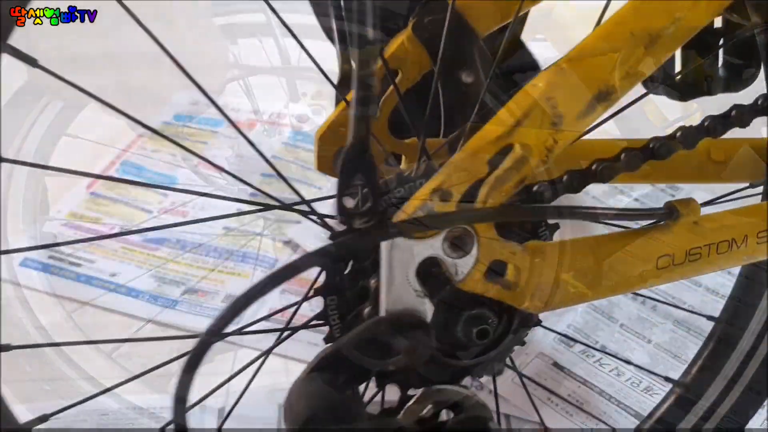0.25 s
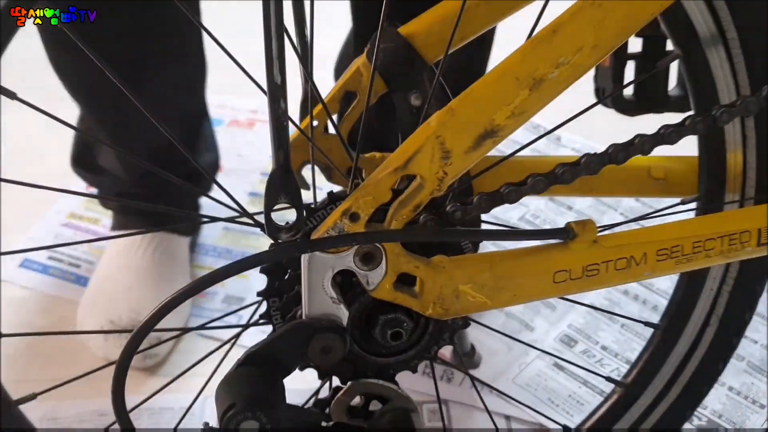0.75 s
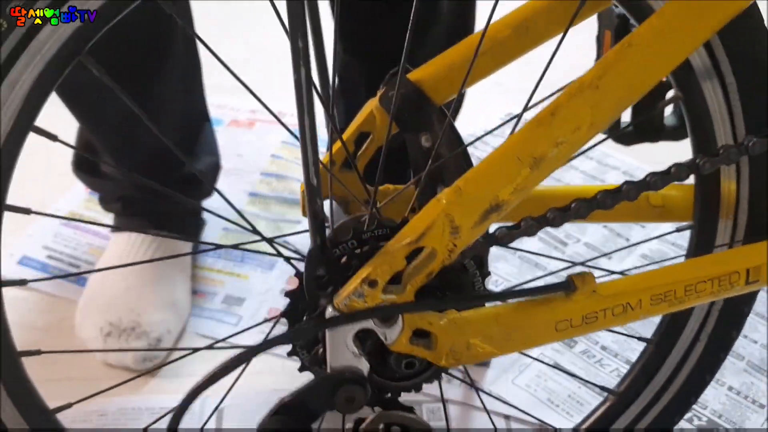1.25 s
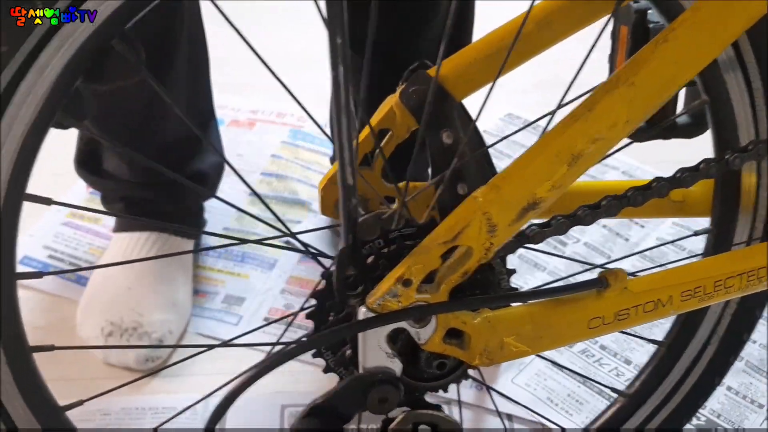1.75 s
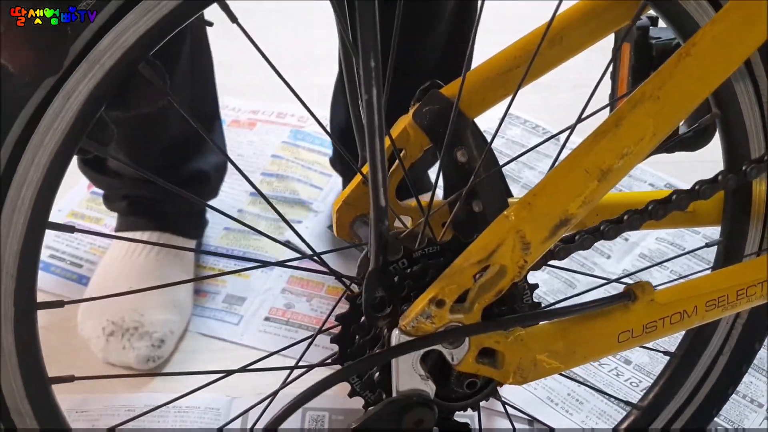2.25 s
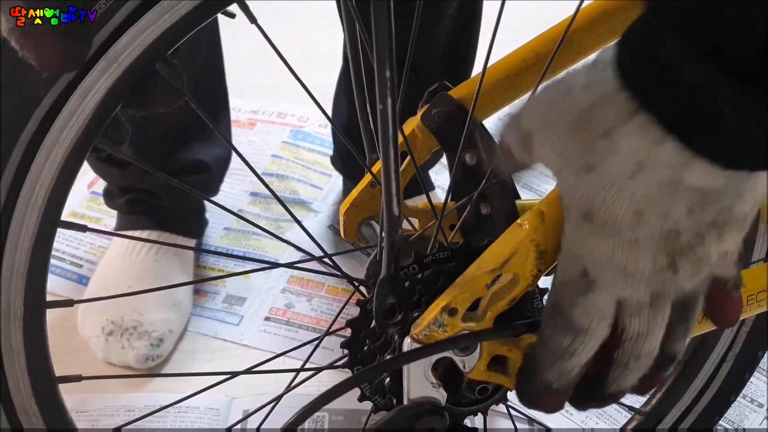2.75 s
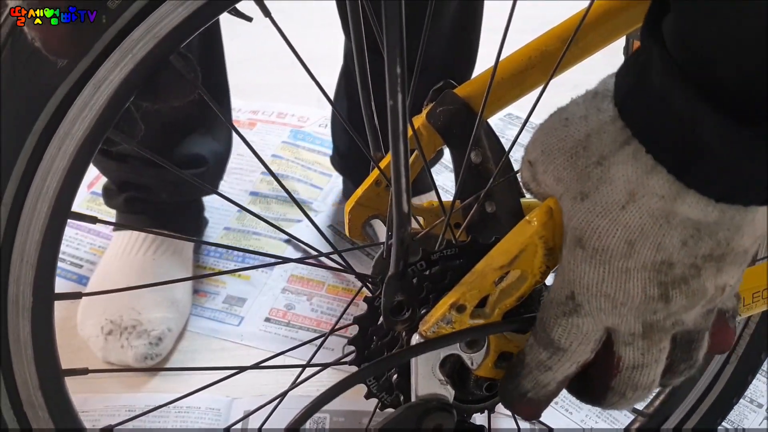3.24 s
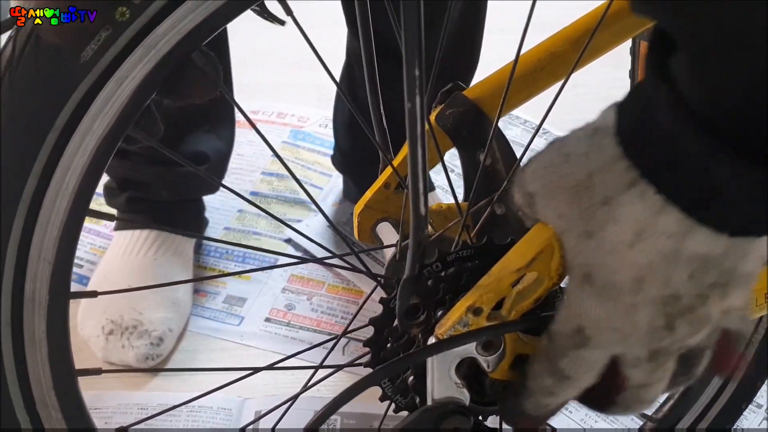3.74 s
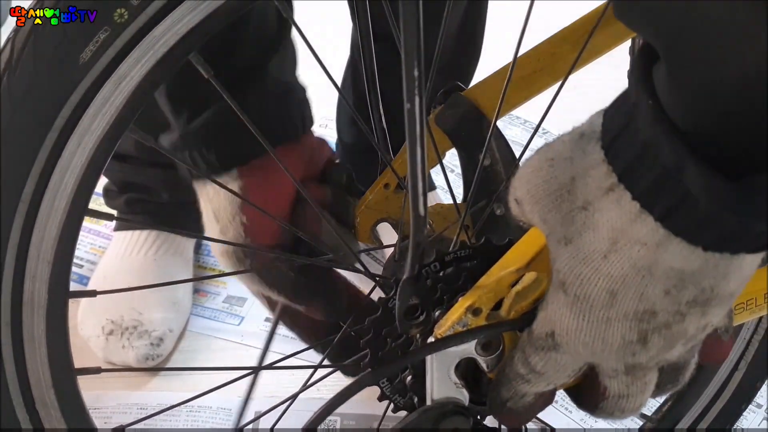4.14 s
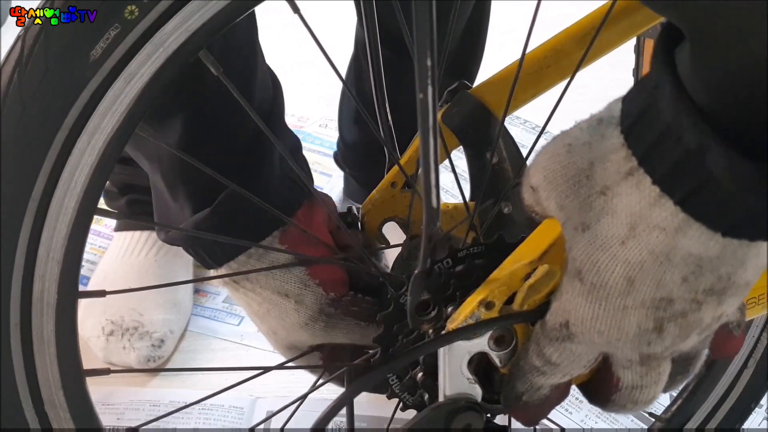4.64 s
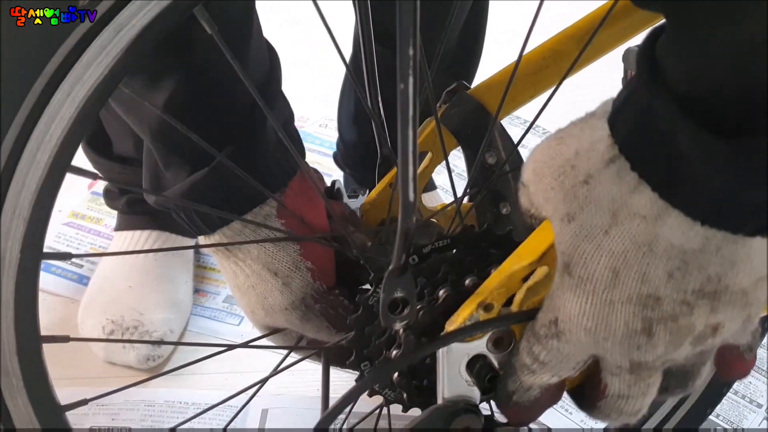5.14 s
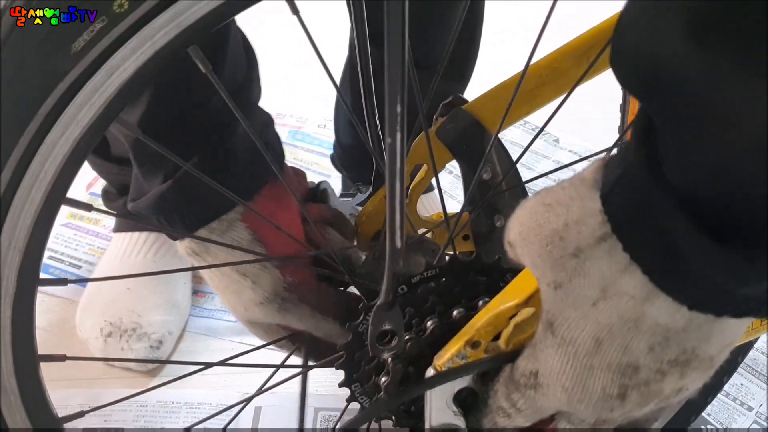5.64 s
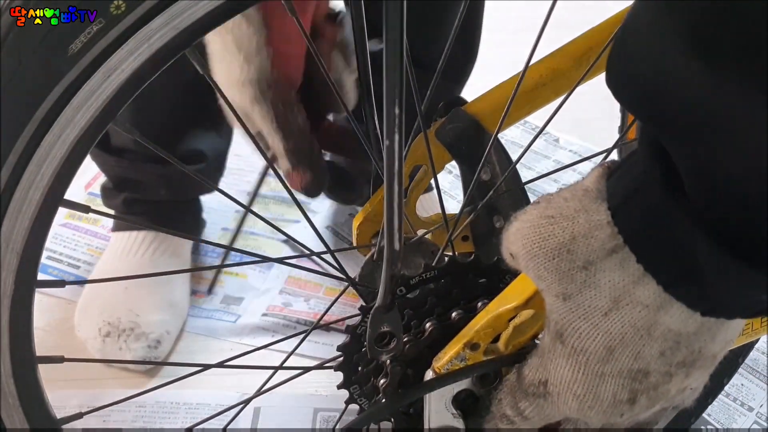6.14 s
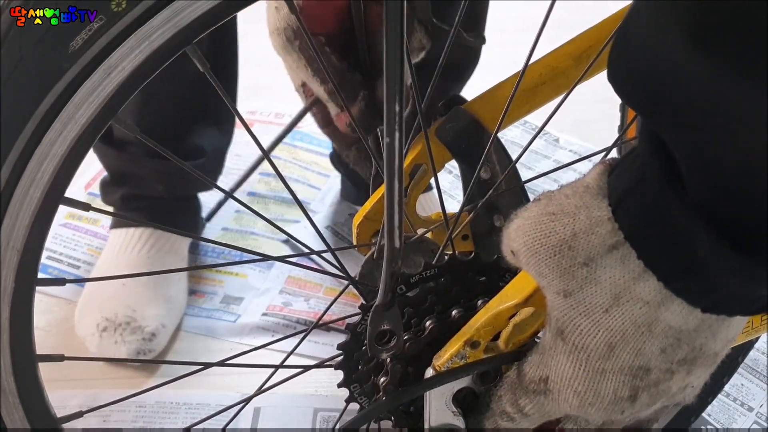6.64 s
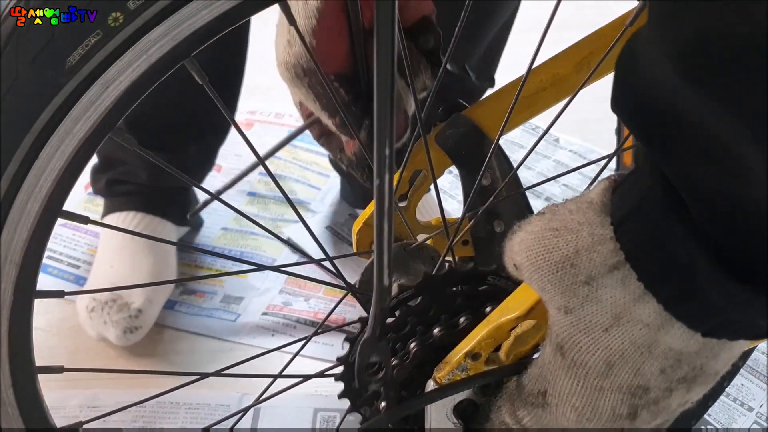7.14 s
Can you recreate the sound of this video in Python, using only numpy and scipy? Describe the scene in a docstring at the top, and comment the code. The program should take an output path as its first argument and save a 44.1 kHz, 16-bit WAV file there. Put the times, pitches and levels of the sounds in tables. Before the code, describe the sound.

A bicycle wheel is worked into its frame with metal knocks, scrapes, chain ticks and a tool tapping spokes in a small room.

```python
"""Refitting a bicycle's rear wheel

A small hard-walled room, a stereo pair of microphones close to a bicycle standing on newspaper.
As the wheel is worked into the frame, the axle scrapes and knocks in the dropouts and sets the tubes
ringing, the chain ticks over the sprockets and the tyre bumps on the floor. A gloved hand reaches
through the wheel with a thin tool that taps the spokes and clanks on the hub."""
import sys
import numpy as np
from scipy import signal
from scipy.fft import rfft, irfft
from scipy.io import wavfile

SR = 44100
rng = np.random.default_rng(int(sys.argv[2]) if len(sys.argv) > 2 else 0)


def digitize_waveform(pressure):
    """Quantize a signal to 16-bit integers and store it at the path in sys.argv[1].

    Rows of a 2-D input are taken as channels; values are limited to [-1, 1].
    """
    field = np.atleast_2d(pressure).T
    bounded = np.clip(field, -1, 1)
    quanta = np.round(bounded * 32767).astype(np.int16)
    wavfile.write(sys.argv[1], SR, quanta)


N = 325899

# gloves, chain and tyre slide steadily: t/s, length/s, level/dB, rumble/dB re level
SLIDES = [(0, 0.12, -56.5, -9.5), (0.31, 0.42, -71, 2), (0.66, 0.49, -69.5, -29), (0.968, 0.047, -60.5, -7),
          (1.218, 0.35, -65.5, 2.5), (1.77, 0.09, -62, -3.5), (2.135, 0.16, -62, -6.5),
          (2.315, 0.65, -71.5, 0), (3.171, 0.21, -68.5, -1), (3.716, 0.18, -67, 1),
          (3.877, 0.54, -73.5, -0.5), (4.372, 0.57, -63.5, 3.5), (5.128, 0.15, -68.5, 7),
          (5.933, 0.23, -77.5, -0.5), (6.64, 0.87, -74.5, 2.5), (7.153, 0.13, -64.5, -5.5)]
# the wheel is shoved and the axle grinds in the dropouts: peak t/s, level/dB
SHOVES = [(1.958, -50.5), (3.554, -54.5), (4.855, -56.5), (5.333, -50), (5.375, -47)]
# spectra of the rubbing, its scrape and its low rumble: f/Hz, level/dB
SCRAPE_SPECTRUM = [(700, -4.5), (1100, -6), (1600, -1), (2200, -5), (3400, -4.5), (5500, -7), (7800, -12.5),
                   (10000, -10), (15000, -16.5)]
RUMBLE_SPECTRUM = [(100, 6.5), (230, -1), (360, 1.5), (800, -7)]
# metal sticks and slips: t/s, length/s, f/Hz, level/dB, upper octave/dB re level
SQUEAKS = [(0.04, .07, 1985, -52, 5), (5.263, .006, 3000, -48, -16)]
# axle and hub knock on the frame: t/s, level/dB, bass/dB re level, treble/dB re level, t60/s
KNOCKS = [(0.142, -16.5, 4, -1.5, 0.087), (0.1478, -35.5, 13.5, -4, 0.16),
          (1.0694, -43.5, 18.5, 10.5, 0.026), (1.3071, -47.5, 13.5, 2.5, 0.09),
          (1.532, -45.5, 11.5, 6.5, 0.027), (1.958, -44, 9.5, 10, 0.083), (2.0291, -44, 5.5, 6, 0.038),
          (2.822, -50.5, 2, 0, 0.16), (3.5032, -35.5, 7.5, -3.5, 0.072), (3.536, -42, 5.5, 2.5, 0.064),
          (3.597, -45.5, 11, 5, 0.066), (4.639, -45, -13, 7.5, 0.078), (4.716, -52, 10, 14, 0.19),
          (4.8735, -35.5, 7, 0, 0.044), (5.3256, -27.5, -18, 4, 0.017), (5.3535, -31.5, -10, 9.5, 0.021)]
# modes of frame and wheel: f/Hz, level/dB, t60/s
FRAME_MODES = [(545, 2, .11), (702, -6, .12), (864, -6, .25), (1901, -8, .3), (2735, -1, .2),
               (2904, 0, .25), (3016, -1, .25), (3283, 12, .08), (3432, -1, .22), (3712, -1, .25)]
# spectrum of metal contact, for knocks and chain: f/Hz, level/dB
CONTACT_SPECTRUM = [(150, -4.5), (400, -4), (550, -8.5), (1200, -4), (1600, -4), (2200, -1), (3400, 0.5),
                    (4800, -5.5), (7500, -11), (10000, -11), (15000, -19)]
# links tick on the sprockets: t/s, level/dB, treble/dB re level
CHAIN_TICKS = [(0.858, -44.5, -5.5), (1.727, -50, 3.5), (1.771, -48, 6), (2.007, -45, -13),
               (2.305, -42.5, 2), (2.952, -47.5, -4.5), (3.25, -53, 10), (3.426, -49.5, -4),
               (3.669, -49, 4.5), (3.743, -39.5, 3), (5.1699, -39, -14), (5.306, -36, -6.5),
               (6.874, -47.5, 1), (7.077, -63.5, 19)]
# the tyre meets the floor: t/s, bounce level/dB, bounce f/Hz, thud level/dB
TYRE_BUMPS = [(1.003, -54, 60, -36.5), (1.017, -35.5, 57, -56), (1.305, -57.5, 77, -46.5),
              (1.616, -59, 60, -52.5), (1.916, -45, 60, -47.5), (1.94, -50.5, 81, -40.5),
              (2.824, -63.5, 64.5, -50), (3.509, -46.5, 83.3, -57), (4.454, -67.5, 60, -42.5),
              (4.497, -66, 60, -49), (5.357, -47, 60, -39.5), (5.374, -41.5, 48.6, -45),
              (5.41, -41.5, 55.4, -43), (5.425, -62, 60, -43.5)]
# modes of the tyre casing: f/Hz, level/dB, t60/s
TYRE_MODES = [(144.4, -3.5, 0.21), (242, 0.11, 0.064), (292, -4, 0.076), (364, -4.5, 0.085)]
# the frame settles with a dull clunk: t/s, level/dB
CLUNKS = [(1.517, -41.5), (4.76, -50.5), (4.859, -41), (4.875, -35), (7.185, -58.5)]
# modes of its hollow tubes: f/Hz, level/dB, t60/s
TUBE_MODES = [(215, -3, .12), (544, 0, .13), (692, -2, .12)]
# the tool taps the spokes: t/s, tick level/dB, twang level/dB, left/dB re right
SPOKE_TAPS = [(4.3354, -35, -36, 3), (4.4315, -37.5, -40, 1), (4.530, -37.5, -62, -0.5),
              (4.546, -41, -65, -4)]
# modes of a tensioned spoke: f/Hz, level/dB, t60/s
SPOKE_MODES = [(603, -7, .13), (1118, -2, .055), (6800, -7, .13)]
# spectrum of the tick on a spoke: f/Hz, level/dB
TAP_SPECTRUM = [(700, -16.5), (1400, -0.5), (2000, -14), (4300, -8), (6800, -1), (7800, -10), (9300, -2.5),
                (15000, -9)]
# the tool's shaft strikes the hub: t/s, crack level/dB, ring level/dB, crack t60/s
CLANKS = [(4.565, -25, -59, 0.064), (4.732, -56, -47.5, 0.054), (5.4368, -32.5, -52, 0.015),
          (7.182, -43.5, -64, 0.099)]
# modes of the shaft, also pitched up for the chain links: f/Hz, level/dB, t60/s
SHAFT_MODES = [(1120, -5, .03), (1960, 6, .07), (2347, -9, .2)]
# spectrum of a clank: f/Hz, level/dB
CLANK_SPECTRUM = [(600, -5.5), (1150, 5.5), (1500, 0), (2200, 6), (3400, -1.5), (4500, -1), (7500, -15),
                  (15000, -32)]
# the slack chain shakes: start t/s, end t/s, level/dB
CHAIN_SHAKE = (4.6, 4.9, -51.5)
# the tool's tip skips along a spoke: t/s, level/dB
TIP_SKIPS = [(7.158, -37), (7.263, -37.5)]
# reverberation time of the room: f/Hz, t60/s
ROOM_DECAY = [(500, .43), (900, .6), (3500, .49), (15000, .35)]
# spectrum of the room tone: f/Hz, level/dB
ROOM_TONE_SPECTRUM = [(20, -22.5), (50, -2), (80, 3), (130, -21.5), (300, -26.5), (3000, -54),
                      (15000, -55.5)]


def from_db(db):
    return 10 ** (np.asarray(db) / 20)


def unit_rms(x):
    return x / np.sqrt(np.mean(x ** 2) + 1e-20)


def at_hz(points, hz):
    """Read a table on a log-frequency axis."""
    known_hz, values = np.transpose(points)
    return np.interp(np.log(np.maximum(hz, 1)), np.log(known_hz), values)


def seconds(length):
    return np.arange(int(length * SR)) / SR


def add(track, s, sound):
    """Mix a sound in at time s."""
    at = max(round(s * SR), 0)
    track[..., at:at + sound.shape[-1]] += sound[..., :N - at]


def pan(left_db):
    """Gains that put the left microphone left_db above the right."""
    return from_db(np.array([[left_db], [-left_db]]) / 2)


def band(x, hz, kind="band", order=2):
    return signal.sosfilt(signal.butter(order, hz, kind, fs=SR, output="sos"), x + 1e-18)


def colour(x, spectrum, size=4096):
    """Causal filter of the given shape, falling away past its ends; white noise keeps its power."""
    hz = np.maximum(np.arange(size // 2 + 1) * SR / size, 1)
    skirts = np.minimum(hz / spectrum[0][0], 1) ** 2 * np.minimum(spectrum[-1][0] / hz, 1) ** 2
    gain = unit_rms(from_db(at_hz(spectrum, hz)) * skirts)
    cepstrum = irfft(np.log(gain))
    cepstrum[1:size // 2] *= 2   # fold to minimum phase
    cepstrum[size // 2 + 1:] = 0
    impulse = irfft(np.exp(rfft(cepstrum)))
    return signal.oaconvolve(x, impulse[None], axes=1)[:, :N]


def stereo_noise(count, alike):
    """White noise that the two microphones share with correlation alike."""
    mid, side = rng.standard_normal((2, count))
    alike = np.clip(alike, 0, 1)
    return np.sqrt((1 + alike) / 2) * mid + np.sqrt((1 - alike) / 2) * side * [[1], [-1]]


def drift(hz, hop=40, settle=2000):
    """Random wander of unit RMS, mostly slower than hz."""
    pole = np.exp(-2 * np.pi * hz * hop / SR)
    noise = rng.standard_normal(N // hop + 2 + settle)
    slow = signal.lfilter([1], [1, -2 * pole, pole * pole], noise)[settle:]
    return np.interp(np.arange(N) / hop, np.arange(len(slow)), unit_rms(slow))


def crack(t60, alike, edge, snap_share=0.063, rise_s=0.00049):
    """One contact: a sharp force pulse, then countless short-lived modes dying together."""
    t = seconds(.2)
    attack = (1 + edge * np.exp(-t / .001)) * (1 - np.exp(-t / rise_s))
    envelope = attack * from_db(-60 * t / max(t60, .004))
    energy = np.sum(envelope ** 2)
    burst = stereo_noise(len(t), alike) * envelope
    pulse = np.arange(len(t)) == rng.integers(20, 30, (2, 1))   # its own arrival at each microphone
    burst += pulse * np.sqrt(snap_share * energy)
    return burst * np.sqrt(energy / np.sum(burst ** 2, axis=1, keepdims=True))


def ring(modes, phase_spread, build_cycles):
    """One blow: each mode swells and dies, at a random strength, with its own phase per microphone."""
    t = seconds(.3)
    hz, db, t60 = np.transpose(modes)[:, :, None]
    strength = from_db(db + rng.standard_normal(hz.shape))
    phase = phase_spread * rng.standard_normal((2, len(modes), 1))
    envelope = (1 - np.exp(-t * hz / build_cycles)) * from_db(-60 * t / t60)
    return np.sum(strength * envelope * np.sin(2 * np.pi * hz * t + phase), axis=1)


def rubbing_levels(attack_share=0.15, release_s=0.036, swell_db_per_s=217, fade_db_per_s=147):
    """Amplitudes of scrape and rumble: slides start, hold and stop; shoves swell to a peak and fade."""
    t = np.arange(N) / SR
    # each move is (amplitude, rumble/dB); the hands never rest completely
    moves = [(np.full(N, from_db(-80)), 2.5)]
    for s, length, db, rumble_db in SLIDES:
        attack = np.clip((t - s) / (attack_share * length), 0, 1)
        release = np.exp(-np.maximum(t - s - length, 0) / release_s)
        moves.append((from_db(db) * attack * release, rumble_db))
    for s, db in SHOVES:
        below_peak_db = np.maximum((s - t) * swell_db_per_s, (t - s) * fade_db_per_s)
        moves.append((from_db(db - below_peak_db), -1.5))
    scrape = np.sqrt(sum(level ** 2 for level, _ in moves))
    rumble = np.sqrt(sum((level * from_db(rumble_db)) ** 2 for level, rumble_db in moves))
    return scrape, rumble


def rubbing(catches_per_s=260, catch_db=5.5, catch_s=0.0016, gritty_db=-62, uneven_db=3, wander_db=4):
    """Light rubbing is a smooth rustle; pressed harder, the surfaces catch in tiny, uneven grains."""
    level, rumble_level = rubbing_levels()
    catches = rng.random(N) < catches_per_s / SR
    sizes = from_db(catch_db * np.minimum(rng.exponential(1, N), 4))
    grains = unit_rms(signal.lfilter([1], [1, -np.exp(-1 / (catch_s * SR))], catches * sizes + 1e-18))
    pressure = level / (level + from_db(gritty_db))
    grain_share = pressure / 2
    grip = np.sqrt(1 - grain_share + grain_share * grains ** 2)
    grip *= from_db(uneven_db * pressure * drift(hz=15))
    scrape = colour(stereo_noise(N, alike=0.13) * level * grip, SCRAPE_SPECTRUM)
    brightness = from_db(wander_db * pressure * drift(hz=9.2))
    scrape += (brightness - 1) * band(scrape, [2800, 4200], order=1)
    rumble = colour(stereo_noise(N, alike=0.74) * rumble_level, RUMBLE_SPECTRUM)
    return rumble + from_db(4) * scrape * pan(left_db=3)


def metal_squeaks():
    """Dry metal sticks and slips unevenly, exciting two broad resonances an octave apart."""
    out = np.zeros((2, N))
    for s, length, hz, db, octave_db in SQUEAKS:
        count = len(seconds(length))
        slips = stereo_noise(count, alike=0.43) * rng.exponential(1, count)
        edges_hz = hz * np.array([.9, 1.1])
        low = unit_rms(band(slips, edges_hz))
        high = unit_rms(band(slips, 2 * edges_hz))
        add(out, s, from_db(db) * np.hanning(count) * (low + from_db(octave_db) * high))
    return out


def axle_knocks(ring_db=-20.5, full_ring_db=-19, hollow_below_hz=800):
    """Each knock is a short clunk under a crack; the hard ones bring out the ring of the whole frame."""
    contact, frame = np.zeros((2, 2, N))
    for s, db, bass_db, treble_db, t60 in KNOCKS:
        blow = crack(t60, alike=0.88, edge=0.3)
        bass = band(blow, [170, 1000]) / 2 + band(blow, [520, 780], order=1)   # hollow tubes
        middle = band(crack(t60, alike=.3, edge=1.5), [850, 5500], order=4)
        treble = band(crack(t60, alike=0, edge=1.5), 5500, "high", order=4)
        add(contact, s, from_db(db) * (from_db(bass_db) * bass + middle + from_db(treble_db) * treble))
        # the tubes' hollow modes follow the bass of each knock
        modes = [(hz, mode_db + (bass_db if hz < hollow_below_hz else 0), decay)
                 for hz, mode_db, decay in FRAME_MODES]
        hardness = min(from_db((db - full_ring_db) / 2), 1)
        ringing = ring(modes, phase_spread=0.33, build_cycles=0.55)
        add(frame, s, hardness * from_db(db + ring_db) * ringing)
    return (colour(contact, CONTACT_SPECTRUM) + frame) * pan(left_db=1.5)


def chain_ticks():
    """Links tick lightly on the sprockets, mostly reaching the left microphone a little earlier."""
    out = np.zeros((2, N))
    lags = rng.integers(-12, 4, len(CHAIN_TICKS))   # samples
    for (s, db, treble_db), lag in zip(CHAIN_TICKS, lags):
        left, right = crack(t60=0.03, alike=0.92, edge=0.77)
        tick = np.array([np.roll(left, lag), right])
        treble = from_db(treble_db) * band(tick, 6500, "high", order=4)
        add(out, s, from_db(db) * (band(tick, [1200, 5500]) + treble))
    return colour(out, CONTACT_SPECTRUM) * pan(left_db=2)


def tyre_bumps(bounce_t60=0.2):
    """The bicycle bounces on its tyre, well to the right, while the casing gives a hollow thud."""
    out = np.zeros((2, N))
    for s, bounce_db, hz, thud_db in TYRE_BUMPS:
        bounce = ring([(hz, 0, bounce_t60)], phase_spread=0.35, build_cycles=0.052)
        thud = ring(TYRE_MODES, phase_spread=0.76, build_cycles=0.57)
        add(out, s, from_db(bounce_db) * bounce * pan(left_db=-20.5))
        add(out, s, from_db(thud_db) * thud * pan(left_db=-2))
    return out


def frame_clunks(puff_db=10, ring_db=-5):
    """The frame settles with a padded blow: a low puff and the hollow ring of the tubes."""
    out = np.zeros((2, N))
    for s, db in CLUNKS:
        puff = band(crack(t60=0.15, alike=0.83, edge=0.86), [190, 880])
        add(out, s, from_db(db + puff_db) * puff)
        add(out, s, from_db(db + ring_db) * ring(TUBE_MODES, phase_spread=0.57, build_cycles=0.35))
    return out


def spoke_taps(shimmer_hz=(2990, 15530), shimmer_db=-22, shimmer_t60=0.099):
    """The tool ticks on a spoke; the taut wire twangs and shimmers with high overtones of its own."""
    ticks, wire = np.zeros((2, 2, N))
    for s, tick_db, twang_db, left_db in SPOKE_TAPS:
        shimmer = [(hz, tick_db + shimmer_db, shimmer_t60) for hz in rng.uniform(*shimmer_hz, size=24)]
        twang = [(hz, twang_db + db, t60) for hz, db, t60 in SPOKE_MODES]
        add(ticks, s, from_db(tick_db) * pan(left_db) * crack(t60=0.052, alike=0.077, edge=0.098))
        add(wire, s, pan(left_db) * ring(twang + shimmer, phase_spread=0.15, build_cycles=6.8))
    return colour(ticks, TAP_SPECTRUM) + wire


def hub_clanks():
    """Steel on steel: a hard, mid-heavy crack and a brief ring of the tool's shaft."""
    contact, shaft = np.zeros((2, 2, N))
    for s, crack_db, ring_db, t60 in CLANKS:
        add(contact, s, from_db(crack_db) * crack(t60, alike=0.13, edge=0.32))
        add(shaft, s, from_db(ring_db) * ring(SHAFT_MODES, phase_spread=0.45, build_cycles=1))
    return (colour(contact, CLANK_SPECTRUM) + shaft) * pan(left_db=1)


def chain_rattle(chinks_per_s=80, spread_db=0.5, spread_octaves=0.84):
    """The slack chain jiggles: links chink at random, each at its own pitch."""
    out = np.zeros((2, N))
    start, end, db = CHAIN_SHAKE
    for s in rng.uniform(start, end, int(chinks_per_s * (end - start))):
        strength = from_db(db + spread_db * rng.standard_normal())
        pitch = 2 ** rng.uniform(0, spread_octaves)
        link_modes = [(hz * pitch, mode_db, t60 / 2) for hz, mode_db, t60 in SHAFT_MODES]
        add(out, s, strength / 4 * ring(link_modes, phase_spread=0.61, build_cycles=1))
        add(out, s, strength * crack(t60=0.033, alike=0.39, edge=0.7))
    return colour(out, CONTACT_SPECTRUM)


def tip_skips(gap_s=0.0065, above_hz=5600):
    """The tool's light tip bounces once per skip: two thin, dry ticks that leave the wire silent."""
    out = np.zeros((2, N))
    for s, db in TIP_SKIPS:
        for touch in (s, s + gap_s):
            add(out, touch, from_db(db) * crack(t60=0.032, alike=0, edge=0))
    return band(out, above_hz, "high", order=3)


def room(x, build_s=0.0019):
    """Reflections off the near walls thicken within milliseconds and die soonest in the top treble."""
    t = seconds(.8)
    edges_hz = np.geomspace(60, 18000, 10)
    tail = np.zeros((2, len(t)))
    for low, high in zip(edges_hz, edges_hz[1:]):
        t60 = at_hz(ROOM_DECAY, np.sqrt(low * high))
        reflections = stereo_noise(len(t), alike=300 / high)   # both microphones get the same bass
        tail += band(reflections, [low, high]) * from_db(-60 * t / t60)
    tail *= 1 - np.exp(-t / build_s)
    tail /= np.sqrt(np.sum(tail ** 2) / 2)
    return signal.oaconvolve(x, tail, axes=1)[:, :N]


def scene(metal_room_db=-6, bump_room_db=-14, rub_room_db=-10, tool_carries_above_hz=1450):
    """All is close to the microphones; of tool and spokes only the upper range carries into the room."""
    metal = axle_knocks() + chain_ticks() + chain_rattle() + metal_squeaks()
    tool = hub_clanks() + spoke_taps() + tip_skips()
    bumps = tyre_bumps() + frame_clunks()
    rub = rubbing()
    room_tone = from_db(-66.5) * colour(stereo_noise(N, alike=0.9), ROOM_TONE_SPECTRUM)
    to_walls = from_db(metal_room_db) * (metal + band(tool, tool_carries_above_hz, "high"))
    to_walls += from_db(bump_room_db) * bumps + from_db(rub_room_db) * rub
    return metal + tool + bumps + rub + room(to_walls) + room_tone


def record(dry):
    """The top is cut steeply above 15.7 kHz."""
    return signal.sosfilt(signal.ellip(10, .1, 70, 15700, fs=SR, output="sos"), dry)


dry = scene()
out = record(dry)
digitize_waveform(out)
```